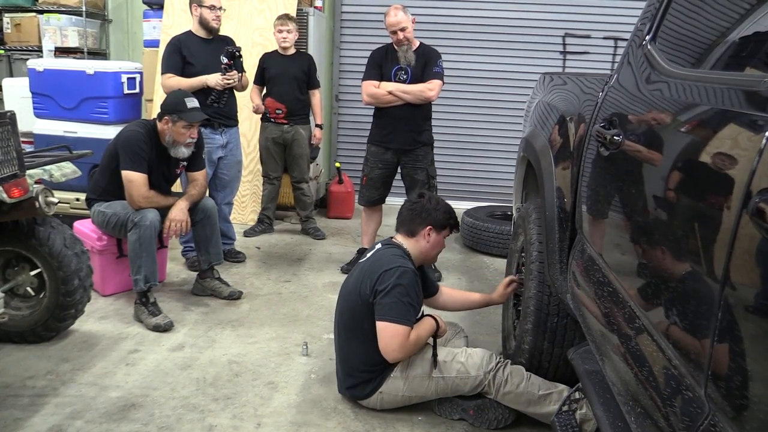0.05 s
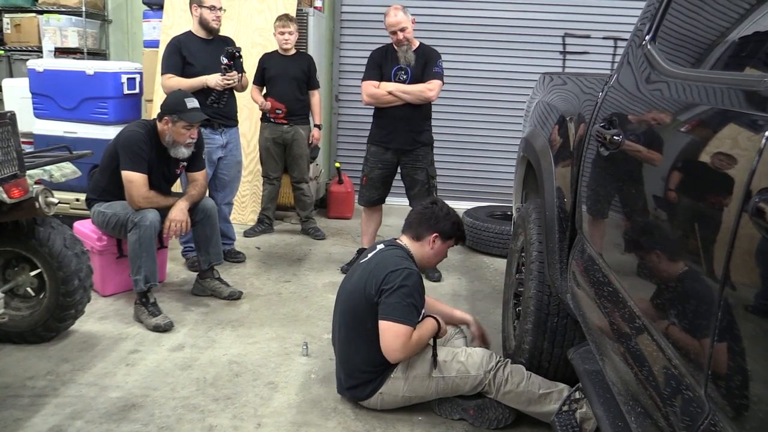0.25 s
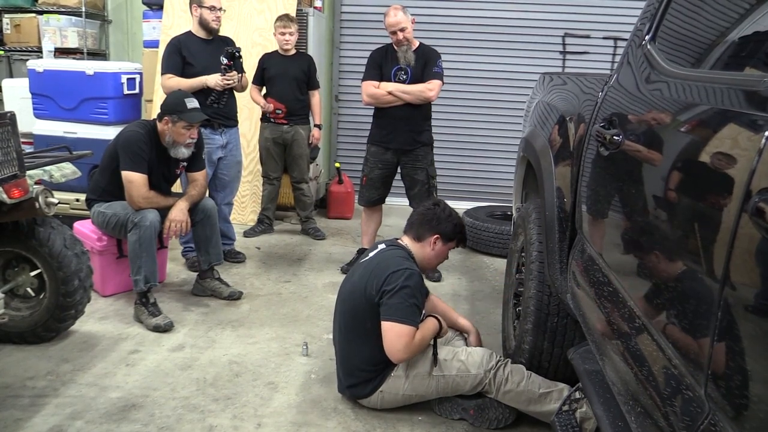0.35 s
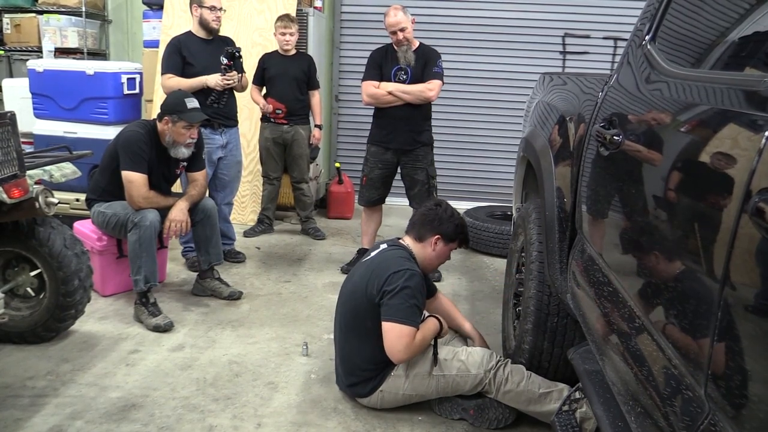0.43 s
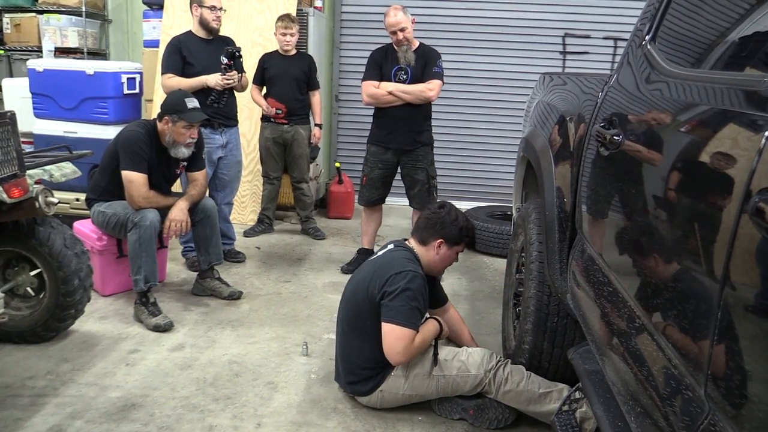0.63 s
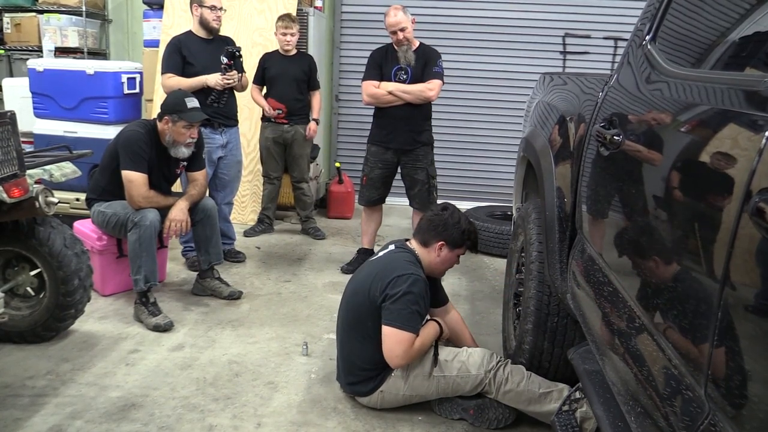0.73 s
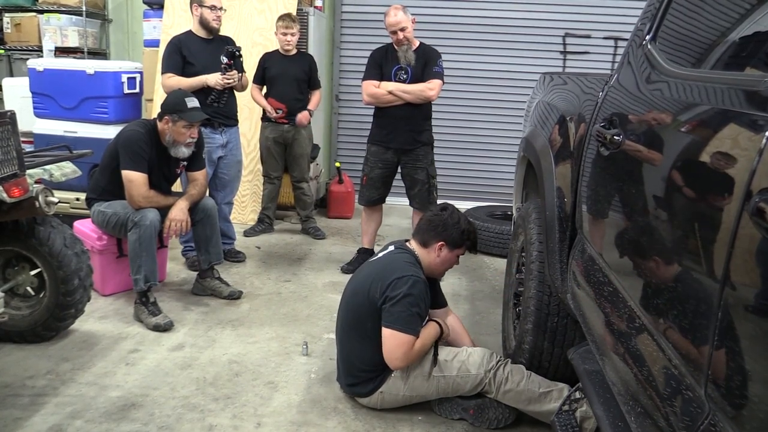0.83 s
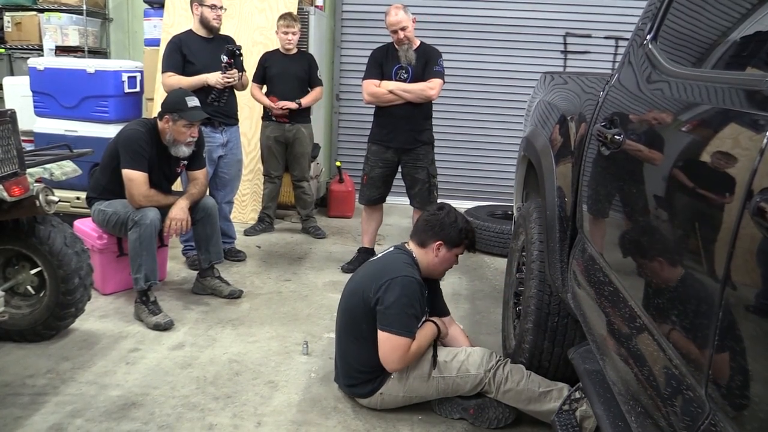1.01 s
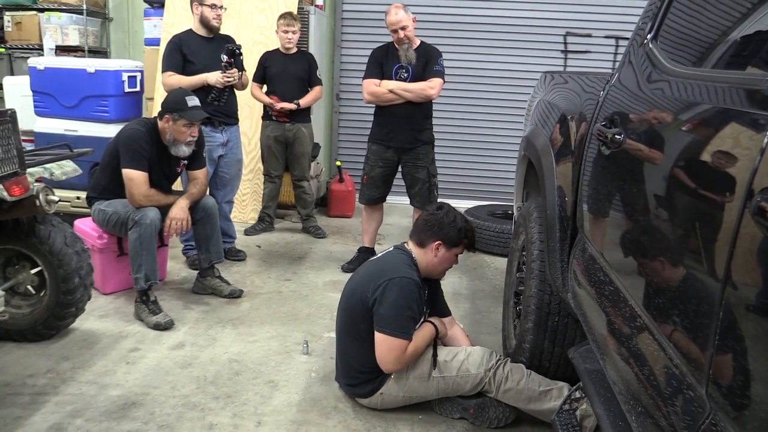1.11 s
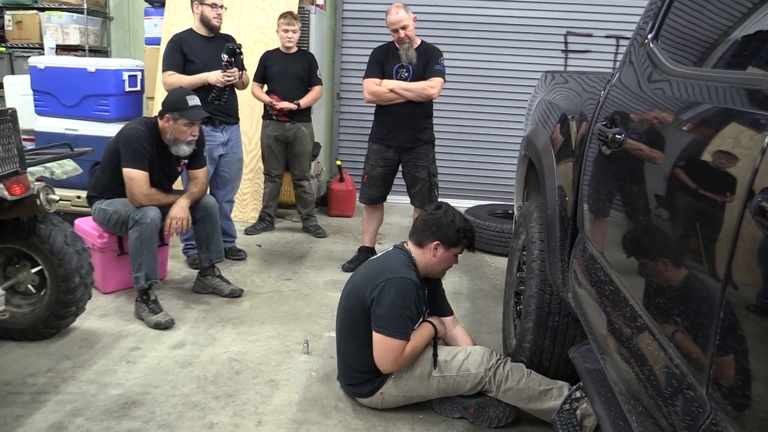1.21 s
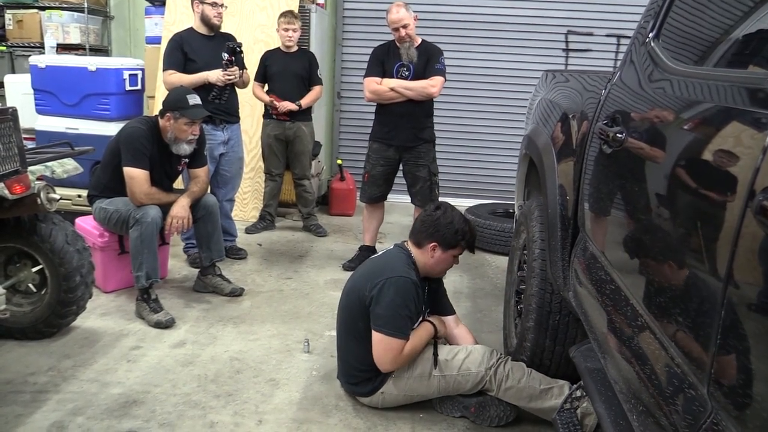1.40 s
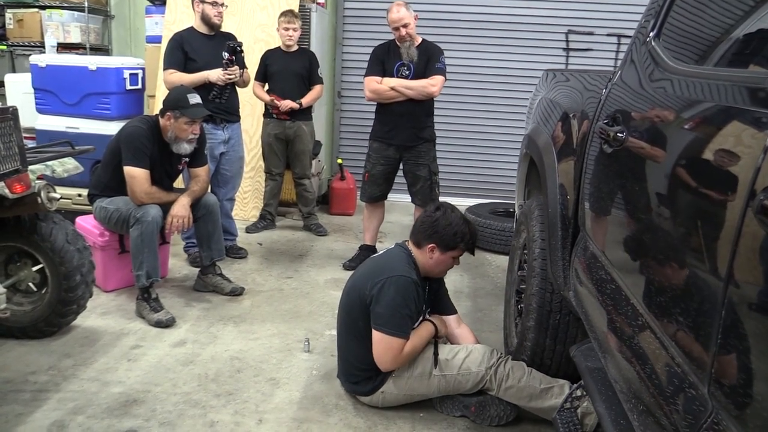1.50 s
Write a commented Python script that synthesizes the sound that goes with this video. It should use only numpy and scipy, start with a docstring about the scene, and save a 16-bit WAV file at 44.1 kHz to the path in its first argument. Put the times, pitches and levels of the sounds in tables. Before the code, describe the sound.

Small loose metal nuts jingle brightly as a hollow steel tool scrapes and knocks against concrete

```python
"""A wrench clanks off a wheel; then steel lug nuts and the socket tool shuffle on a concrete garage floor.
Nuts: decaying partials just above 11 kHz, noise ticks, and narrow noise bursts most like skids.
Wrench: a sum of short modes. Tool: random grit catches scrape, filtered impulses knock, the socket's modes hoot.
Soft low thuds and dull brushes are damped modes and noise. Each event gets its own scattered room tail.
Below lie a low room rumble and a faint hiss, both of coloured noise."""
import sys
import numpy as np
from scipy import signal
from scipy.fft import rfft, irfft, next_fast_len
from scipy.io import wavfile

SR = 44100
rng = np.random.default_rng(int(sys.argv[2]) if len(sys.argv) > 2 else 0)


def dump(signal):
    """Clip the signal to [-1, 1] and save it as 16-bit WAV at the path in sys.argv[1]."""
    limited = np.clip(np.atleast_2d(signal).T, -1, 1)
    pcm = np.round(limited * 32767).astype(np.int16)
    wavfile.write(sys.argv[1], SR, pcm)


N = 68355  # samples
EVENT_S, LEVEL_WINDOW_S = 0.4, 0.02


def undb(db):
    """Decibels to gain."""
    return 10 ** (np.asarray(db) / 20)


def clock():
    """Time [s] since the start of one event."""
    return np.arange(int(EVENT_S * SR)) / SR


def decay(t, t60_s):
    """Exponential fall of 60 dB in t60_s."""
    return np.exp(-np.log(1000) * t / t60_s)


def highpass(x, cut_hz):
    """Second-order low cut."""
    return signal.sosfilt(signal.butter(2, cut_hz, "highpass", fs=SR, output="sos"), x)


def colour(x, points, lag_s=0):
    """Minimum-phase filter through (frequency [Hz], level [dB]); lag_s delays the lows as bending waves do."""
    n = 2 * next_fast_len(len(x))
    f = np.fft.rfftfreq(n, 1 / SR)
    hz, db = np.array(points).T
    gain = undb(np.interp(np.log(f + 1), np.log(hz), db))
    # fold the cepstrum to make the filter causal
    cepstrum = irfft(np.log(gain))
    cepstrum[1:n // 2] *= 2
    cepstrum[n // 2 + 1:] = 0
    # group delay: lag_s * sqrt(1000 / f)
    bend = 4 * np.pi * lag_s * np.sqrt(1000 * f)
    response = np.exp(rfft(cepstrum) - 1j * bend)
    return irfft(rfft(x, n) * response)[:len(x)]


def ring(hz, t60_s, modes):
    """Struck piece: sine partials (ratio, level [dB]) that share one decay."""
    t = clock()
    partials = sum(undb(db) * np.sin(2 * np.pi * hz * ratio * t) for ratio, db in modes)
    return partials * decay(t, t60_s)


def chatter(rise_s):
    """Flurry of tiny contacts: noise that swells to a peak at rise_s, then dies."""
    t = clock()
    return rng.standard_normal(len(t)) * t / rise_s * np.exp(-t / rise_s)


def resonate(x, hz, width_hz):
    """One resonance, gain 1 at its centre."""
    return signal.lfilter(*signal.iirpeak(hz, hz / width_hz, fs=SR), x)


def at_level(x, db):
    """Scale to the energy of a LEVEL_WINDOW_S burst with this RMS level."""
    return x * undb(db) / np.sqrt(np.sum(x ** 2) / (LEVEL_WINDOW_S * SR))


# room decay: (frequency [Hz], t60 [s])
ROOM_T60 = [(120, 0.38), (400, 0.11), (700, 0.22), (1200, 0.35), (2500, 0.38), (6000, 0.23), (11000, .22),
            (16000, 0.055)]
ROOM_GAP_S, ROOM_BUILD_S = 0.0016, 0.00073  # first reflection, build-up time constant
ROOM_GRAIN = 0.48  # inequality of the reflections


def garage(x, room_db):
    """Direct sound plus freshly drawn scattered reflections whose decay depends on frequency."""
    t = clock()
    n = len(t)
    scatter = rfft(rng.standard_normal(n) * np.exp(ROOM_GRAIN * rng.standard_normal(n)))
    hz, t60s = np.array(ROOM_T60).T
    log_f = np.log(np.fft.rfftfreq(n, 1 / SR) + 1)
    tail = np.zeros(n)
    for band, t60_s in zip(np.eye(len(hz)), t60s):
        tail += irfft(scatter * np.interp(log_f, np.log(hz), band), n) * decay(t, t60_s)
    tail *= 1 - np.exp(-np.maximum(t - ROOM_GAP_S, 0) / ROOM_BUILD_S)
    reflected = signal.fftconvolve(x, tail)[:n]
    return at_level(x, 0) + at_level(reflected, room_db)


def add(out, start_s, x, db, room_db):
    """Place one event in the garage; room_db is reflected relative to direct energy."""
    i = int(start_s * SR)
    out[i:i + len(x)] += at_level(garage(x, room_db), db)[:N - i]


# nuts touching: (time [s], ring level [dB], ring pitch [Hz], tick level [dB], room on the ring [dB])
CLINKS = [(0.001, -70, 11270, -44, 2.5), (0.053, -45.5, 11270, -63, 6), (0.117, -40, 11290, -52, 18),
          (0.139, -37.5, 11290, -57.5, -2), (0.191, -33.5, 11300, -37.5, 10), (0.202, -29, 11330, -43, -7),
          (0.205, -21, 11290, -35, 5), (0.216, -16.5, 11250, -28, -6.5), (0.224, -25, 11370, -44, -8),
          (0.251, -24, 11230, -38, 19), (0.304, -29.5, 11270, -59, 24), (0.402, -32.5, 11350, -38.5, 6),
          (0.413, -46, 11370, -41, 9), (0.4241, -29, 11330, -32.5, -2.5), (0.481, -33, 11340, -58, 0),
          (0.487, -39.5, 11300, -44, -9), (0.5, -34.5, 11290, -69, 3), (0.521, -38.5, 11340, -65, 23),
          (0.551, -35, 11370, -42.5, 1), (0.592, -40, 11340, -45, -20), (0.602, -31, 11360, -47, -13),
          (0.611, -42, 11360, -41, -8), (0.622, -50, 11360, -45.5, -6.5), (0.669, -44.5, 11340, -59, -9),
          (0.852, -49.5, 11340, -56.5, 15), (0.876, -36, 11280, -57, 5), (0.886, -34.5, 11290, -47.5, -11),
          (0.910, -36.5, 11330, -61.5, 1.5), (0.928, -28.5, 11370, -60.5, -4),
          (0.945, -33, 11330, -55, -11), (0.985, -46, 11340, -81, -9.5), (1.269, -56, 11390, -88.5, -26)]
# nut partials: (ratio to ring pitch, relative level [dB])
NUT_MODES = [(1, 0), (1.005, -7), (.995, -8), (1.023, -20), (.978, -23)]
# tick spectrum: (frequency [Hz], relative level [dB])
TICK_COLOUR = [(1500, -13), (4000, -8), (5100, 2), (5600, 1), (6300, 1.5), (8800, -4), (10950, 7),
               (11300, 19), (11650, 10), (12400, 0), (15800, -1.5)]
NUT_T60_S, NUT_ATTACK_S, TICK_S = 0.061, 0.0025, 0.003
TICK_ROOM_DB = 4  # ticks scatter more than rings


def nuts():
    """Each touch excites a bright noise tick and the nuts' high ring."""
    out = np.zeros(N)
    attack = (1 - np.exp(-clock() / NUT_ATTACK_S)) ** 2
    for start_s, ring_db, hz, tick_db, room_db in CLINKS:
        add(out, start_s, ring(hz, NUT_T60_S, NUT_MODES) * attack, ring_db, room_db)
        tick = colour(chatter(TICK_S), TICK_COLOUR)
        add(out, start_s, tick, tick_db, room_db + TICK_ROOM_DB)
    return out


# narrow-band noise bursts, most like nuts skidding; the 12.9 kHz one is a faint high blip:
# (time [s], level [dB], centre [Hz], swell [s])
NOISE_BURSTS = [(0.116, -60.5, 8000, 0.0027), (0.215, -37, 7130, .003), (0.262, -44.5, 6770, 0.03),
                (0.425, -42, 7500, .003), (0.495, -43, 4800, 0.012), (0.604, -51.5, 5850, .008),
                (0.734, -65, 12900, 0.0052), (0.734, -67.5, 5730, 0.0045), (0.878, -52.5, 6140, 0.0022),
                (0.9445, -60.5, 5900, 0.0015)]
BURST_WIDTH, BURST_ROOM_DB = 0.18, -0.5  # width as a fraction of centre


def noise_bursts():
    """Swelling noise through two equal resonances in series."""
    out = np.zeros(N)
    for start_s, db, hz, swell_s in NOISE_BURSTS:
        width_hz = hz * BURST_WIDTH
        burst = resonate(resonate(chatter(swell_s), hz, width_hz), hz, width_hz)
        add(out, start_s, burst, db, BURST_ROOM_DB)
    return out


# wrench modes: (frequency before WRENCH_TUNING [Hz], relative level [dB], t60 [s])
WRENCH_MODES = [(1034, -7.5, .06), (1125, -10, 0.031), (1724, -3.5, 0.065), (1726, -4.5, 0.06),
                (2033, -5, 0.06), (2584, -19, 0.094), (2775, -8.5, .07), (3866, -8.5, 0.0451),
                (4295, -5, 0.024), (4300, -10.5, 0.046), (5000, -10, 0.04), (5105, -0.5, 0.022),
                (5600, -7, .03), (6078, -15.5, .04), (8330, -17, 0.063)]
WRENCH_START_S, WRENCH_DB, WRENCH_ROOM_DB = 0.0, -32.5, 1
WRENCH_TUNING = 0.99


def wrench():
    """One clank as it leaves the wheel: many short modes of random polarity."""
    out = np.zeros(N)
    clank = np.zeros(len(clock()))
    for hz, db, t60_s in WRENCH_MODES:
        clank += ring(hz, t60_s, [(WRENCH_TUNING, db)]) * rng.choice([-1, 1])
    add(out, WRENCH_START_S, clank, WRENCH_DB, WRENCH_ROOM_DB)
    return out


# tool sliding, a light touch has less bass: (time [s], nominal length [s], level [dB], room [dB], low cut [Hz])
SCRAPES = [(0.0, .014, -37, -4, 424), (0.176, 0.024, -45, 6, 900), (0.203, 0.019, -23.5, 8.5, 201),
           (0.214, 0.045, -23, -8.5, 390), (0.26, 0.015, -30.5, 0, 1900), (0.295, 0.03, -34.5, 1.5, 2030),
           (0.339, 0.016, -51, 3, 1430), (0.404, 0.011, -32, 5, 397), (0.424, 0.012, -29, -1.5, 452),
           (0.438, 0.022, -33, -12, 610), (0.496, 0.024, -31.5, 1.5, 1515), (0.548, 0.026, -33, -6, 888),
           (0.614, 0.018, -42, -8.5, 300), (0.850, 0.0054, -53.5, 1.5, 304), (0.878, 0.01, -48, 1, 300),
           (0.897, 0.07, -50.5, 1, 300)]
# scrape spectrum: (frequency [Hz], relative level [dB])
SCRAPE_COLOUR = [(100, -37.5), (350, 1.5), (550, -6.5), (800, -2), (1200, -5.5), (1650, -0.5), (2300, -0.5),
                 (3400, -5.5), (4500, -12.5), (5600, -28.5), (9000, -19), (15000, -44.5)]
# resonances added to the rub: (frequency [Hz], width [Hz], gain of the added part [dB])
SCRAPE_RESONANCES = [(760, 58, -3.5), (1327, 128, -5), (1600, 170, 1.5), (2120, 94, -19), (2610, 29, -15.5),
                     (3200, 72, -9), (4080, 170, -13)]
GRIT_PER_S, GRIT_SPREAD_DB, SCRAPE_RISE_S = 3000, 3, 0.000992
JUDDER_DB, JUDDER_PER_S = 3, 260


def scrapes():
    """The tool sticks and slips over grit: random signed catches under juddering pressure."""
    out, t = np.zeros(N), clock()
    for start_s, length_s, db, room_db, low_hz in SCRAPES:
        catches = (rng.random(len(t)) < GRIT_PER_S / SR) * rng.choice([-1, 1], len(t))
        catches = catches * undb(GRIT_SPREAD_DB * rng.standard_normal(len(t)))
        # full until 0.75 length, zero at 1.25 length
        release = np.clip(2 * (length_s - t) / length_s + 0.5, 0, 1)
        judder = np.interp(t * JUDDER_PER_S, np.arange(100), rng.standard_normal(100))
        pressure = (1 - np.exp(-t / SCRAPE_RISE_S)) * release * undb(JUDDER_DB * judder)
        rub = highpass(colour(catches * pressure, SCRAPE_COLOUR), low_hz)
        body = sum(undb(gain_db) * resonate(rub, hz, width_hz) for hz, width_hz, gain_db in SCRAPE_RESONANCES)
        add(out, start_s, rub + body, db, room_db)
    return out


# hard tool knocks, a glancing one has less bass: (time [s], level [dB], room [dB], low cut [Hz], top [Hz])
KNOCKS = [(0.1914, -32, 8, 327, 4730), (0.2203, -31.5, -7, 900, 4700), (0.2451, -31.5, -2, 1200, 4700),
          (0.2526, -31.5, 2, 900, 3600), (0.2742, -38.5, 4, 1190, 4400), (0.2981, -38, -2, 1800, 3500),
          (0.3994, -25.5, -3.5, 330, 4540), (0.4865, -29, -7, 330, 5270), (0.4894, -31, 0.5, 3300, 6400),
          (0.5452, -31, -2, 336, 3800)]
# knock spectrum: (frequency [Hz], relative level [dB])
KNOCK_COLOUR = [(100, -31), (450, 0), (800, 1.5), (1800, 7.5), (3000, 3.5), (4500, -4.5), (6000, -12)]
KNOCK_LAG_S = 0.00035  # delay of 1 kHz through the bending steel


def knocks():
    """Band-limited impulses, their lows delayed by bending waves in the steel."""
    out = np.zeros(N)
    for start_s, db, room_db, low_hz, top_hz in KNOCKS:
        blow = highpass(signal.unit_impulse(len(clock())), low_hz)
        blow = signal.sosfilt(signal.butter(8, top_hz, fs=SR, output="sos"), blow)
        add(out, start_s, colour(blow, KNOCK_COLOUR, KNOCK_LAG_S), db, room_db)
    return out


# socket's hollow ringing: (time [s], level [dB], pitch [Hz], t60 [s], room [dB])
HOOTS = [(0.226, -30, 1556, 0.068, 2), (0.247, -32.5, 1630, 0.034, -5), (0.300, -31, 1682, 0.022, 12),
         (0.430, -41, 1750, 0.036, 6), (0.4900, -23, 1618, 0.028, -11.5), (0.505, -31, 1643, 0.09, -12),
         (0.513, -30, 1624, 0.061, -8), (0.53, -36, 1657, 0.069, -12.5), (0.598, -37, 1702, 0.14, -9.5),
         (0.611, -35, 1648, 0.081, -12.5), (0.626, -36.5, 1660, 0.088, -27),
         (0.646, -40, 1720, 0.06, -11.5)]
# socket partials: (ratio to pitch, relative level [dB])
SOCKET_MODES = [(1, 12.5), (0.82, -5), (1.3, -6.5), (.5, -9.5), (1.3, -20), (4.9, -19), (2.1, -20),
                (2.6, -19)]
HOOT_ATTACK_S = 0.000228


def hoots():
    """The hollow socket rings at one strong mode with weaker ones around it."""
    out = np.zeros(N)
    attack = 1 - np.exp(-clock() / HOOT_ATTACK_S)
    for start_s, db, hz, t60_s, room_db in HOOTS:
        add(out, start_s, ring(hz, t60_s, SOCKET_MODES) * attack, db, room_db)
    return out


# soft low thuds, some mere swells of the low room rumble:
# (time [s], level [dB], pitch before THUD_TUNING [Hz], t60 [s], room [dB])
THUDS = [(0.033, -38, 136, 0.08, -20), (0.139, -43, 318, 0.026, -10), (0.193, -35, 344, 0.0077, 4),
         (0.224, -51, 165, 0.06, -16), (0.325, -45.5, 120, 0.08, -22), (0.379, -43, 124, 0.058, -15),
         (0.4875, -32.5, 854, 0.0074, -12.5), (0.5462, -40.5, 876, 0.0075, 0),
         (0.604, -38, 235, 0.014, -0.5), (0.608, -46.5, 830, 0.017, -8), (0.807, -35, 569.6, 0.059, -4),
         (0.813, -29.5, 321, 0.0099, -8.5), (0.82, -34, 416, 0.011, -3), (0.8319, -33.5, 276, 0.016, -2),
         (0.851, -41.5, 428, 0.011, -3), (0.698, -46.5, 142, 0.047, -16), (0.995, -40.5, 155, 0.056, -22),
         (1.109, -44.5, 168, 0.03, -2), (1.265, -44.5, 237, 0.027, -2.5), (1.345, -50, 231.4, 0.086, -5),
         (1.455, -49.5, 219, 0.042, -0.5), (1.513, -49.5, 178.7, .04, -11)]
THUD_TUNING, THUD_PUSH_S = 0.98, 0.002
THUD_LOW_HZ, THUD_TOP_HZ = 89, 960


def thuds():
    """One damped low mode each, with a gradual push, band-limited."""
    out = np.zeros(N)
    push = 1 - np.exp(-clock() / THUD_PUSH_S)
    soft = signal.butter(4, [THUD_LOW_HZ, THUD_TOP_HZ], "bandpass", fs=SR, output="sos")
    for start_s, db, hz, t60_s, room_db in THUDS:
        thud = signal.sosfilt(soft, ring(hz, t60_s, [(THUD_TUNING, 0)]) * push)
        add(out, start_s, thud, db, room_db)
    return out


# cloth and soles brushing: (time [s], length [s], level [dB])
BRUSHES = [(0.119, 0.035, -40.5), (0.808, 0.03, -38.5), (0.832, 0.015, -43)]
# brush spectrum: (frequency [Hz], relative level [dB])
BRUSH_COLOUR = [(150, -10.5), (400, 5), (600, -7.5), (850, -5), (1100, -14.5), (1500, -25.5), (3000, -55),
                (8000, -58)]
BRUSH_ROOM_DB = -4.5


def brushes():
    """Cloth or a sole rubbing: short bursts of dull noise."""
    out, t = np.zeros(N), clock()
    for start_s, length_s, db in BRUSHES:
        rub = rng.standard_normal(len(t)) * (t < length_s)
        add(out, start_s, colour(rub, BRUSH_COLOUR), db, BRUSH_ROOM_DB)
    return out


def steady_noise(points):
    """Coloured noise at unit RMS, with the filter's onset dropped."""
    noise = colour(rng.standard_normal(N + SR // 10), points)[-N:]
    return noise / noise.std()


# rumble spectrum: (frequency [Hz], relative level [dB])
RUMBLE_COLOUR = [(25, -34), (55, -12), (85, -18.5), (118, -0.5), (180, 1.5), (260, -3.5), (400, -10.5),
                 (600, -21.5), (1200, -38), (4000, -69)]
# rumble level: (time [s], level [dB])
RUMBLE_DB = [(0, -46.5), (.7, -51.5), (.85, -45.5), (.98, -45.5), (1.15, -50.5), (1.35, -56), (1.55, -53)]


def rumble():
    """Low room noise whose level drifts slowly."""
    level_db = np.interp(np.arange(N) / SR, *np.array(RUMBLE_DB).T)
    return steady_noise(RUMBLE_COLOUR) * undb(level_db)


# hiss spectrum: (frequency [Hz], relative level [dB])
HISS_COLOUR = [(300, -2.5), (800, 0.5), (1500, 1.5), (3000, -7.5), (6000, -18.5), (8500, -21), (10500, -33),
               (15000, -45)]
HISS_DB = -64


def hiss():
    """Faint noise of constant level, reaching above the rumble."""
    return steady_noise(HISS_COLOUR) * undb(HISS_DB)


def scene():
    """All layers, identical in both channels."""
    metal = nuts() + noise_bursts() + wrench() + scrapes() + knocks() + hoots()
    bumps = thuds() + brushes()
    mono = metal + bumps + rumble() + hiss()
    return np.tile(mono, (2, 1))


TOP_HZ = 15750


def record(dry):
    """Steep elliptic low-pass at TOP_HZ."""
    return signal.sosfilt(signal.ellip(10, 0.2, 80, TOP_HZ, fs=SR, output="sos"), dry)


dry = scene()
out = record(dry)
dump(out)
```